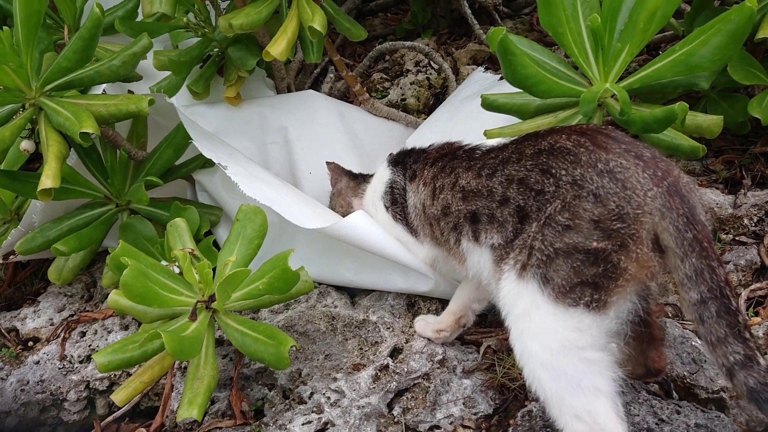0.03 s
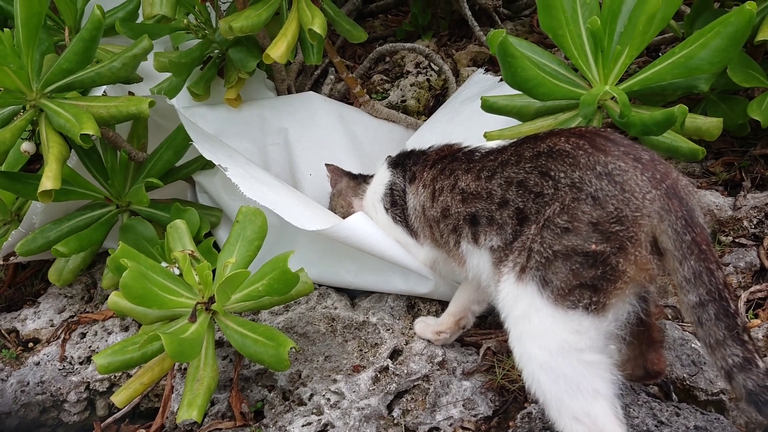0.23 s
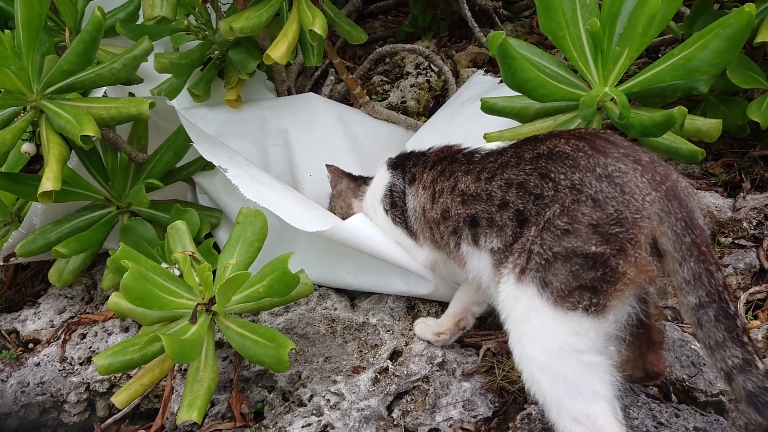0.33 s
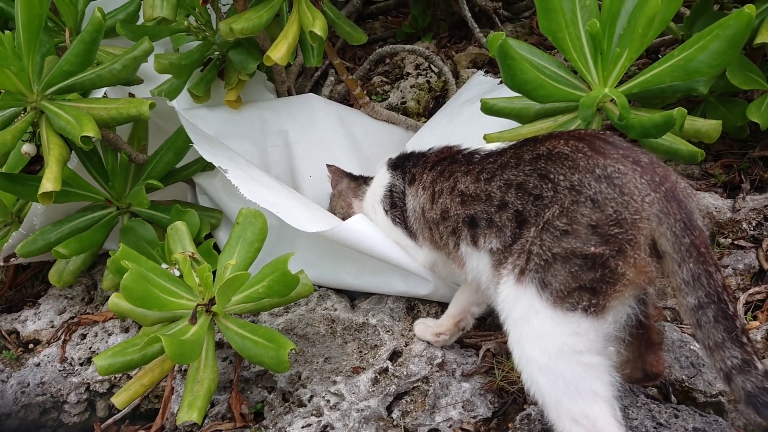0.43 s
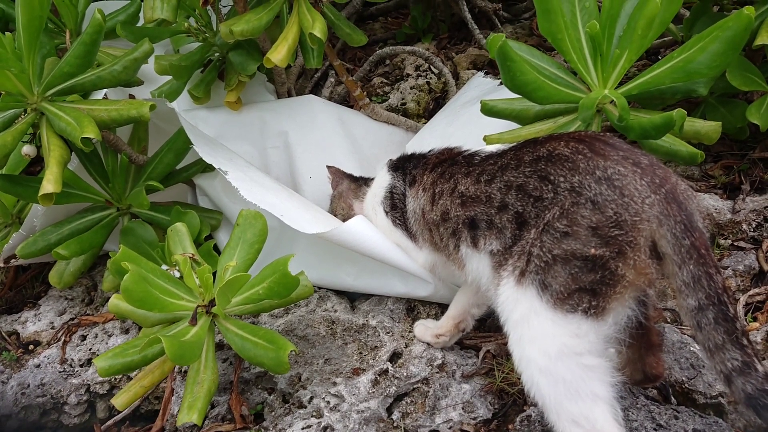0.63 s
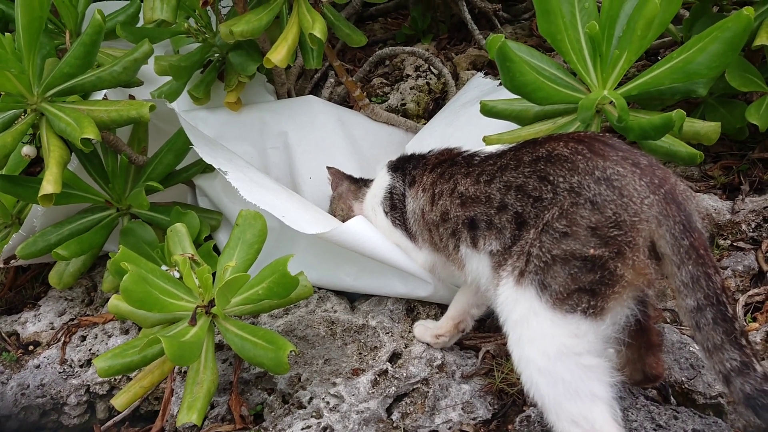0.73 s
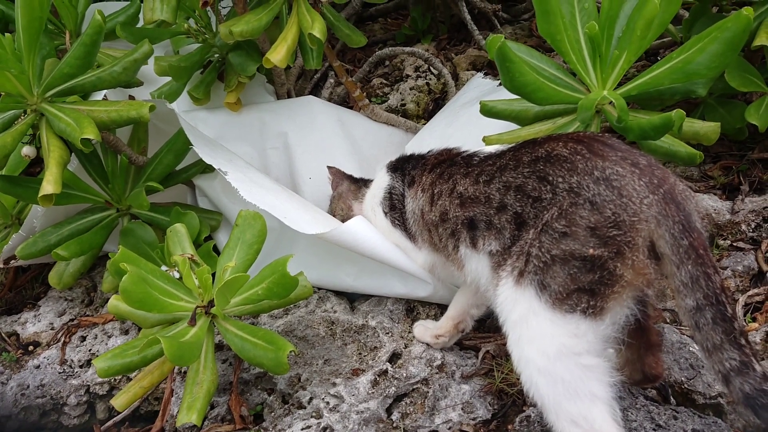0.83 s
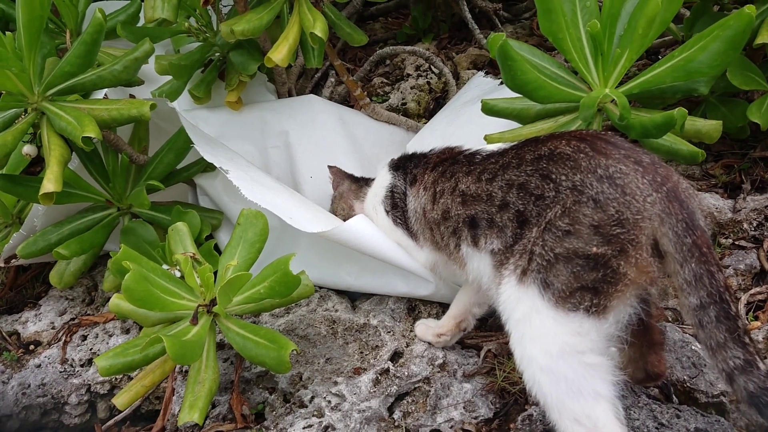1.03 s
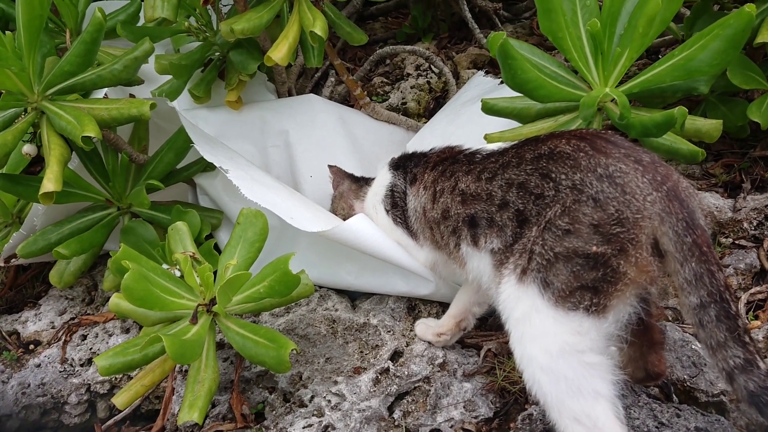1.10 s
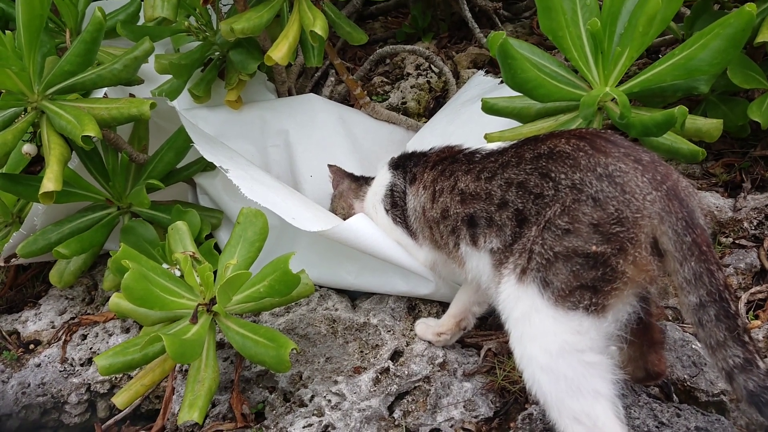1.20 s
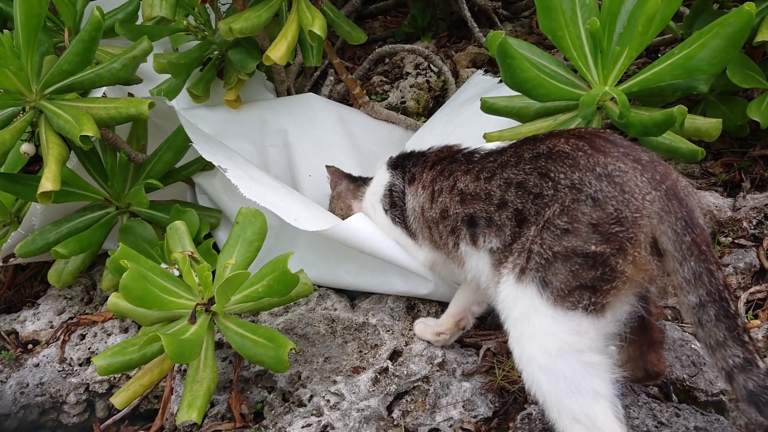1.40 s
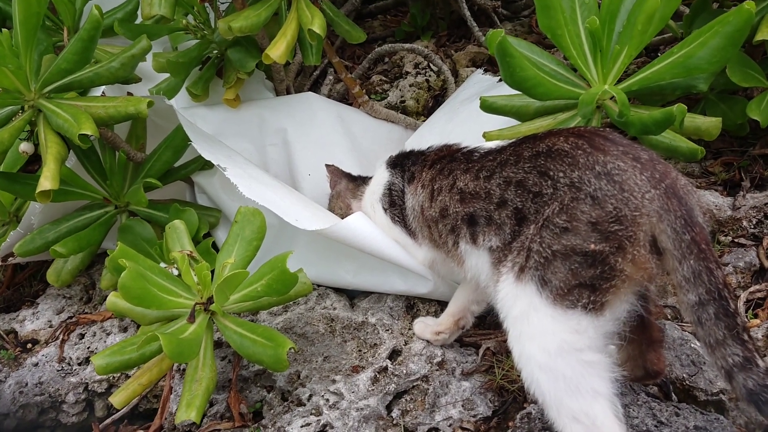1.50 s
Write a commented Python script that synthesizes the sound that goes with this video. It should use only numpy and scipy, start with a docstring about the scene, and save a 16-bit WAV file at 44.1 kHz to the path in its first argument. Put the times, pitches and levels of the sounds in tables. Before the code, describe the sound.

Soft wet ticks of a cat drinking outdoors, under low thumps of wind.

```python
"""Cat lapping among shrubs

Outdoors, a cat laps water from a fold of plastic sheet. The wet film on its tongue snaps in small
ticks, air pockets ring as duller plops, and the water sloshes faintly. A gust buffets the right
microphone port, then a weaker one the left. Behind lie a distant rumble, thin faint whines and hiss."""
import sys
import numpy as np
from scipy import signal
from scipy.fft import rfft, irfft
from scipy.io import wavfile
from scipy.ndimage import uniform_filter1d

SR = 44100
rng = np.random.default_rng(int(sys.argv[2]) if len(sys.argv) > 2 else 0)


def unload_wav(signal):
    """Save mono or channel-first audio to the path in sys.argv[1] as 16-bit WAV at rate SR, clipped to [-1, 1]."""
    wavfile.write(
        sys.argv[1],
        SR,
        np.round(np.clip(np.atleast_2d(signal).T, -1, 1) * 32767).astype(np.int16),
    )


N = 68355
T = np.arange(N) / SR
FREQS = np.maximum(np.arange(N // 2 + 1) * SR / N, 1)


def from_db(db):
    """Decibels to gain."""
    return 10 ** (np.asarray(db) / 20)


def unit_rms(x):
    """Scale to unit rms."""
    return x / np.sqrt(np.mean(x ** 2) + 1e-20)


def pan(left_minus_right_db):
    """Left and right gains for a level difference."""
    return from_db(np.array([[1], [-1]]) * left_minus_right_db / 2)


def over_time(points):
    """A table read at every sample."""
    return np.interp(T, *np.transpose(points))


def over_frequency(points):
    """A table read at every frequency, on a log axis."""
    hz, value = np.transpose(points)
    return np.interp(np.log(FREQS), np.log(hz), value)


def resonance(hz, octaves):
    """Gain of a steep-sided peak with the given centre and width."""
    return 1 / (1 + (np.log2(FREQS / hz) / octaves) ** 2 / 2) ** 2


def noise(gain, likeness=0.):
    """Stereo noise with a given spectrum and likeness of the channels; rms 1."""
    mid, side = rfft(rng.standard_normal((2, N)))
    spectrum = np.sqrt(1 + likeness) * mid + np.sqrt(1 - likeness) * side * [[1], [-1]]
    return unit_rms(irfft(gain * spectrum, N))


def steady(x, span_s):
    """Hold each channel near unit rms over a short span."""
    power = uniform_filter1d(x ** 2, max(int(span_s * SR), 2), axis=-1)
    return x / np.sqrt(np.abs(power) + 1e-9)


# How alike rumble and hiss arrive on the two sides of the microphone: freq_hz, correlation
AMBIENCE_LIKENESS = [(30, 1), (60, 0.75), (150, 0.9), (400, 0.71), (1000, 0.51), (2000, 0.25), (4000, 0),
                     (8000, 0.45), (16000, 0)]
# Spectrum of the rumble in the distance: freq_hz, relative_db
RUMBLE_SPECTRUM = [(20, -46), (40, -3), (58, 1.5), (85, -8), (130, -8), (200, -14), (300, -19.5),
                   (450, -23), (800, -25.5), (1500, -30.5), (3000, -44), (6000, -52.5)]
# Rise and fall of its deepest part: time_s, gain_db
BASS_SWELL = [(0, 13), (0.05, -18), (0.1, 4.5), (0.17, 1), (0.5, 5), (0.84, 1.5), (0.865, -17), (0.89, 5.5),
              (0.95, -1), (1.0, -4), (1.1, -6), (1.15, 3), (1.22, -3), (1.34, 4.5), (1.39, -5),
              (1.47, -2.5), (1.55, 6.5)]
def distant_rumble(level_db=-55.5, swell_below_hz=86):
    """A far rumble whose bass swells and dips."""
    spectrum = from_db(over_frequency(RUMBLE_SPECTRUM))
    rumble = from_db(level_db) * noise(spectrum, over_frequency(AMBIENCE_LIKENESS))
    bass = irfft(rfft(rumble) / (1 + (FREQS / swell_below_hz) ** 4), N)
    swelling_bass = bass.std() * steady(bass, span_s=0.27) * from_db(over_time(BASS_SWELL))
    return rumble - bass + swelling_bass


# Spectrum of the hiss behind the cat: freq_hz, relative_db
HISS_SPECTRUM = [(500, 11), (1500, -8.5), (2500, 0.5), (3200, -0.5), (4000, 1.2), (5000, -4.5),
                 (6900, -9.5), (7500, -23.5), (9000, -16), (9700, -4.5), (15000, -4), (20000, -2.5)]
def hiss(level_db=-70.5):
    """An even, wide hiss."""
    spectrum = from_db(over_frequency(HISS_SPECTRUM))
    return from_db(level_db) * noise(spectrum, over_frequency(AMBIENCE_LIKENESS)) * pan(0.2)


# Thin whines, far off: pitch_hz, width_octaves, peak_db, peak_s, fade_db_per_s
FAR_WHINES = [(2655, 0.0066, -83, .68, 11), (3920, 0.011, -82, 0.075, 15)]
def far_whines():
    """Very narrow bands of noise, each fading either side of its peak."""
    out = np.zeros((2, N))
    for pitch_hz, octaves, peak_db, peak_s, fade_db_per_s in FAR_WHINES:
        band = steady(noise(resonance(pitch_hz, octaves), likeness=0.59), span_s=0.078)
        out += from_db(peak_db - fade_db_per_s * abs(T - peak_s)) * band
    return out


# Wind on the left and on the right microphone port: time_s, level_db
LEFT_GUSTS = [(0, -65), (0.2, -69), (0.27, -47), (0.32, -37), (0.37, -44.5), (0.46, -50), (0.53, -64),
              (0.59, -61), (0.62, -42.5), (0.675, -48.5), (0.72, -57), (0.75, -46.5), (0.80, -43),
              (0.84, -43), (0.86, -75), (1.0, -81), (1.55, -56)]
RIGHT_GUSTS = [(0, -61.5), (0.189, -54), (0.238, -43), (0.275, -45), (0.312, -31), (0.356, -31.5),
               (0.415, -44), (0.446, -36.5), (0.51, -54), (0.57, -42.5), (0.62, -50.5), (0.66, -54),
               (0.9, -69), (1.55, -76)]
# Spectrum of the buffeting at either port: freq_hz, relative_db
WIND_SPECTRUM = [(20, -31), (35, -3.5), (55, 6.5), (80, 5.5), (120, -0.5), (170, -14.5), (250, -33),
                 (350, -38), (500, -53), (1000, -94.5)]
def wind(flutter_hz=219, flutter_db=-8, strong_gust_db=-30):
    """Low turbulence, separate at each port; strong gusts add a faster flutter."""
    level_db = np.array([over_time(LEFT_GUSTS), over_time(RIGHT_GUSTS)])
    flutter = steady(noise(resonance(flutter_hz, octaves=0.28)), span_s=0.068)
    flutter *= from_db(flutter_db + level_db - strong_gust_db)
    turbulence = steady(noise(from_db(over_frequency(WIND_SPECTRUM))), span_s=0.024)
    return from_db(level_db) * (turbulence + flutter)


# Eddies right on the microphone: time_s, peak_db, width_s, rebound_hz, left_minus_right_db
PORT_EDDIES = [(0.092, -47, 0.0011, 121, -5), (0.228, -30.5, 0.0044, 76, -21),
               (0.261, -26.5, 0.0021, 73, -32), (0.294, -19.5, 0.0013, 107, -22),
               (0.311, -30, 0.00091, 129, -20), (0.319, -23, 0.0011, 114, -26),
               (0.341, -30.5, 0.0012, 143, -18), (0.3572, -29, 0.0019, 78.4, -20),
               (0.387, -24.5, 0.0011, 164, -42), (0.453, -22, 0.0011, 80, -39),
               (0.563, -40, 0.0026, 101, -3), (0.636, -42, 0.0014, 110, 14), (0.764, -46.5, 0.0044, 78, 14),
               (0.813, -33.5, 0.0027, 98, 31), (0.844, -36.5, 0.0029, 79, 18),
               (1.334, -48.5, 0.0021, 70, 2.5)]
def eddies(rebound_q=1.25, port_low_hz=46.6):
    """Each eddy is a sharp push on the port, followed by a slower, dying rebound."""
    port_highpass = signal.butter(2, port_low_hz, "high", fs=SR, output="sos")
    out = np.zeros((2, N))
    for time_s, peak_db, width_s, rebound_hz, side_db in PORT_EDDIES:
        push = 1 / np.cosh(np.clip((T - time_s) / width_s, -40, 40))
        w = 1j * FREQS / rebound_hz
        rebound = w ** 2 / (w ** 2 + w / rebound_q + 1)   # resonant high-pass
        thump = signal.sosfilt(port_highpass, irfft(rfft(push) * rebound, N))
        sides = pan(side_db) / pan(side_db).max()
        out -= from_db(peak_db) * thump / abs(thump).max() * sides
    return out


def scatter(laps, level_db=-9, t60_s=0.08):
    """The sheet, leaves and rock throw back a short diffuse tail."""
    tail = rng.standard_normal((2, N // 4)) * from_db(-60 * T[:N // 4] / t60_s)
    tail /= np.sqrt(np.sum(tail ** 2, axis=1, keepdims=True))
    return from_db(level_db) * signal.fftconvolve(laps, tail, axes=1)[:, :N]


# Faint hollow sloshes in the sheet: peak_s, half_length_s, pitch_hz, width_octaves, level_db
WATER_SLOSHES = [(0.636, 0.08, 633, 0.089, -71.5), (1.436, 0.061, 1270, 0.6, -76.5)]
def sloshes():
    """The water swills softly in the fold of plastic."""
    out = np.zeros((2, N))
    for peak_s, half_length_s, pitch_hz, octaves, level_db in WATER_SLOSHES:
        swell = np.exp(-((T - peak_s) / half_length_s) ** 2)
        out += from_db(level_db) * swell * noise(resonance(pitch_hz, octaves), likeness=0.43)
    return out


def rising_tone(age, pitch_hz, rise_per_s):
    """A bubble's ring, climbing by rise_per_s times its starting pitch each second."""
    return np.sin(2 * np.pi * pitch_hz * (age + rise_per_s * age ** 2 / 2))


# Plops in the water where the cat drinks: start_s, level_db, pitch_hz, t60_s, rise_per_s
WATER_PLOPS = [(0.353, -55, 1530, 0.011, 6.5), (0.358, -47, 805, 0.015, 21), (0.361, -58.5, 1540, 0.029, 6),
               (0.6812, -51, 774, 0.016, 79), (0.684, -56, 1435, 0.02, 7.1), (1.082, -63, 1700, 0.02, 6),
               (1.12, -63.5, 1410, 0.031, 6), (1.4215, -53.5, 836, 0.027, 6),
               (1.4475, -54.5, 900, 0.02, 7.1), (1.463, -54, 840, 0.017, 5.3)]
def plops(attack_s=0.0005, spray_db=-7.5):
    """Small air pockets ring briefly, rising in pitch, with a little spray."""
    out = np.zeros((2, N))
    for start_s, level_db, pitch_hz, t60_s, rise_per_s in WATER_PLOPS:
        age = np.maximum(T - start_s, 0)
        spray = from_db(spray_db) * noise(resonance(pitch_hz, octaves=1), likeness=0.096)
        envelope = (1 - np.exp(-age / attack_s)) * from_db(-60 * np.minimum(age / t60_s, 3))
        out += from_db(level_db) * envelope * (rising_tone(age, pitch_hz, rise_per_s) + spray)
    return out


# Wet ticks at the cat's tongue: start_s, level_db, pitch_hz, width_octaves, decay_s, ring_relative_db
TONGUE_TICKS = [(0.002, -70, 4460, 0.25, 0.034, -20), (0.142, -63, 4700, 0.94, 0.0078, -38),
                (0.288, -61.5, 13000, 0.13, .0035, -9), (0.3525, -66, 3500, .7, 0.0048, -26),
                (0.378, -65, 2545, 0.78, 0.0065, 2), (0.379, -78, 4700, 0.45, 0.0089, -22),
                (0.467, -68, 4560, 1, 0.013, -14), (0.685, -71.5, 5400, 0.28, 0.0093, -12),
                (0.6962, -63, 3730, 0.71, 0.0043, -0.5), (0.879, -66.5, 4100, 0.41, 0.0087, -23),
                (1.107, -67, 4200, 0.52, 0.0073, -25), (1.147, -69, 3130, 0.17, 0.0057, -8),
                (1.216, -59, 4220, 0.2, 0.0042, 0.5), (1.2161, -58, 6360, 0.66, 0.0022, -20),
                (1.2337, -58, 6040, 0.72, 0.0035, -14), (1.424, -69.5, 3780, 0.091, 0.0028, 4)]
def tongue_ticks(attack_s=0.0007, grain_db=3.5):
    """The wet film on the tongue snaps: a grainy burst, sometimes with the ring of a tiny bubble."""
    out = np.zeros((2, N))
    for start_s, level_db, pitch_hz, octaves, decay_s, ring_db in TONGUE_TICKS:
        age = np.maximum(T - start_s, 0)
        grain = from_db(grain_db * unit_rms(uniform_filter1d(rng.standard_normal(N), size=50)))
        burst = steady(noise(resonance(pitch_hz, octaves), likeness=0.096) * grain, span_s=0.0049)
        ring = from_db(ring_db) * np.sqrt(2) * rising_tone(age, pitch_hz, rise_per_s=8.7)
        envelope = (1 - np.exp(-age / attack_s)) * np.exp(-age / decay_s)
        out += from_db(level_db) * envelope * (burst + ring)
    microphone_dip = from_db(-16 * resonance(hz=8200, octaves=0.2))
    return irfft(rfft(out) * microphone_dip, N)


def scene(cat_pan_db=-2.5, left_lag_s=0.00034):
    """The cat a little right of centre, wind on the microphone, the background off to the right."""
    laps = (tongue_ticks() + plops() + sloshes()) * pan(cat_pan_db)
    foreground = laps + scatter(laps) + wind() + eddies()
    left, right = distant_rumble() + hiss() + far_whines()
    late_left = np.roll(left, round(left_lag_s * SR))
    return foreground + np.array([late_left, right])


def record(dry, low_cut_hz=30.6, high_cut_hz=15650):
    """The recorder rolls off the deepest bass and cuts the top steeply."""
    bass_loss = 1 + (low_cut_hz / FREQS) ** 8
    treble_loss = 1 + (FREQS / high_cut_hz) ** 400
    return irfft(rfft(dry) / np.sqrt(bass_loss * treble_loss), N)


dry = scene()
out = record(dry)
unload_wav(out)
```